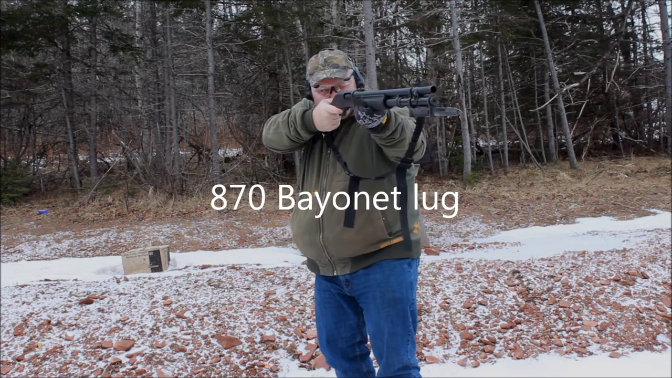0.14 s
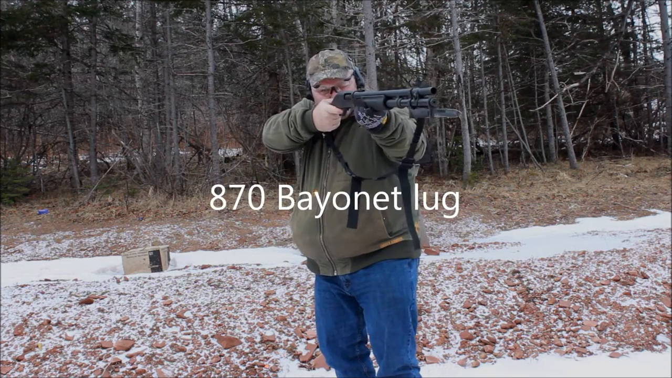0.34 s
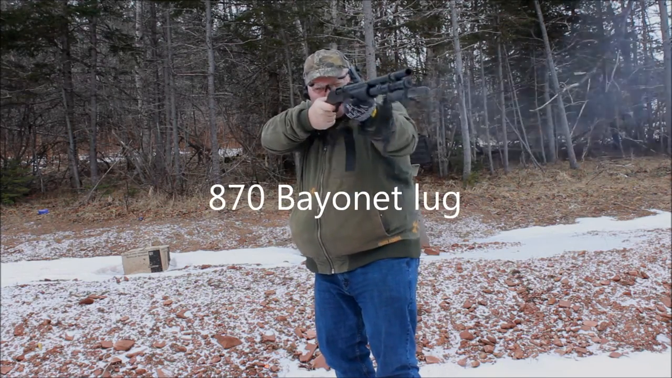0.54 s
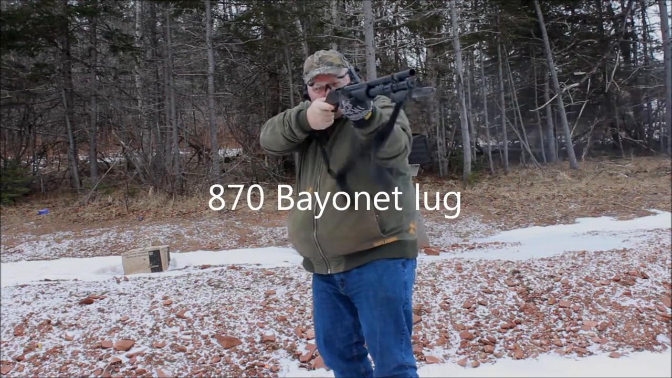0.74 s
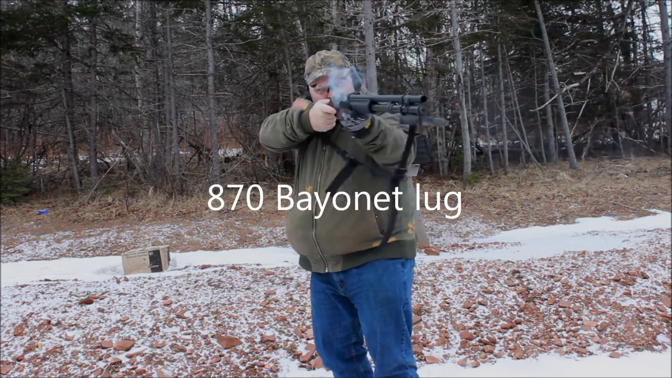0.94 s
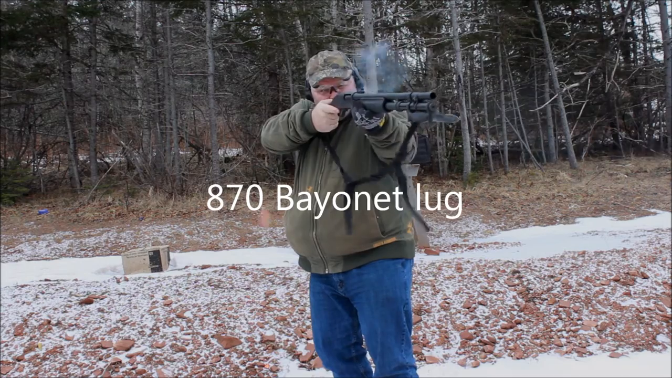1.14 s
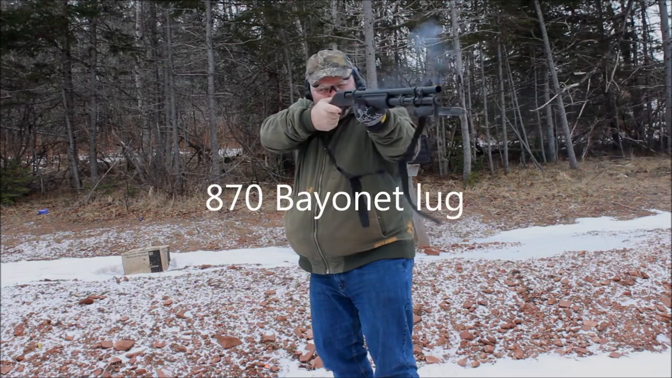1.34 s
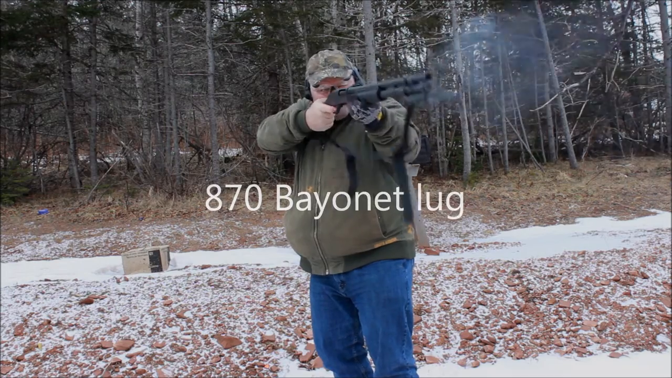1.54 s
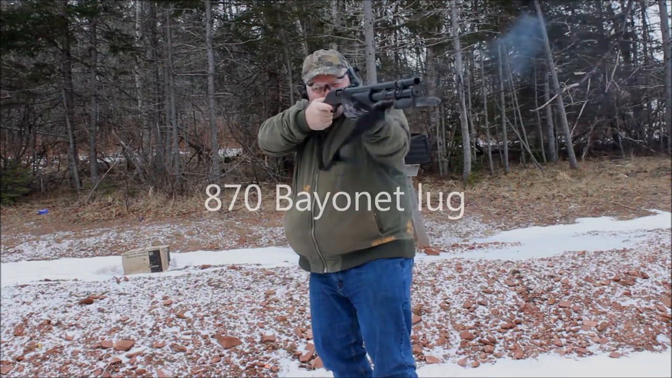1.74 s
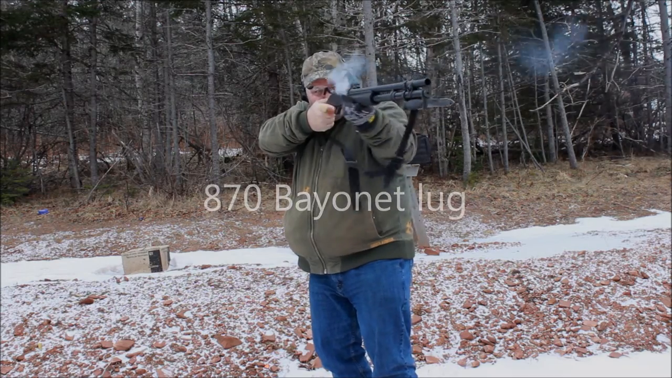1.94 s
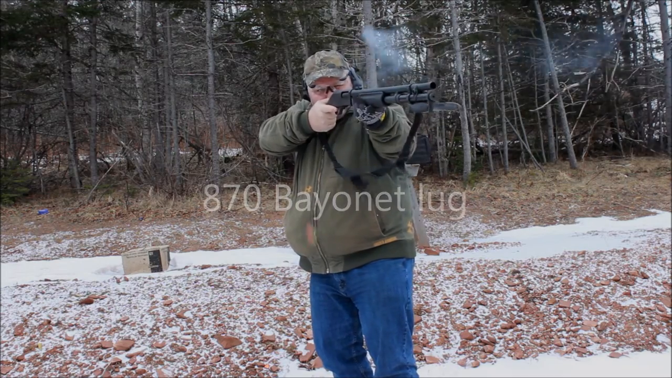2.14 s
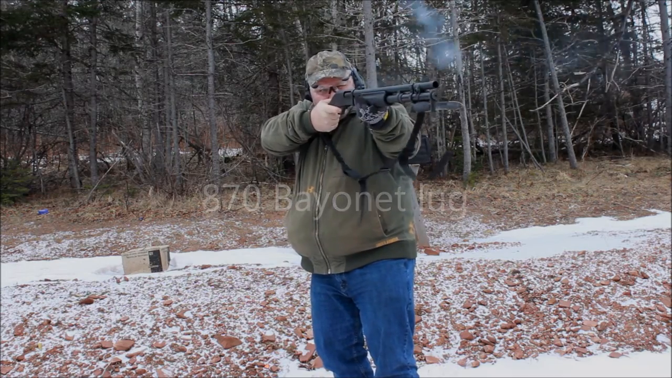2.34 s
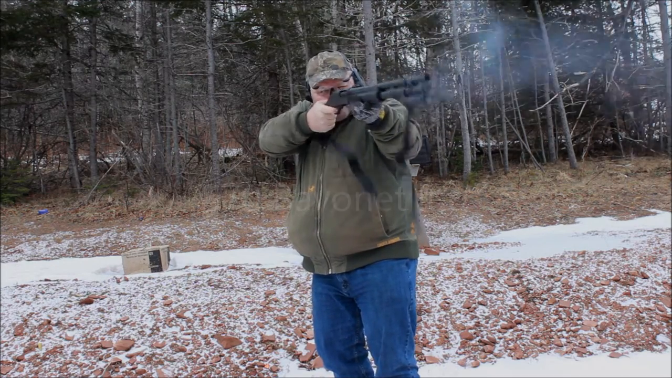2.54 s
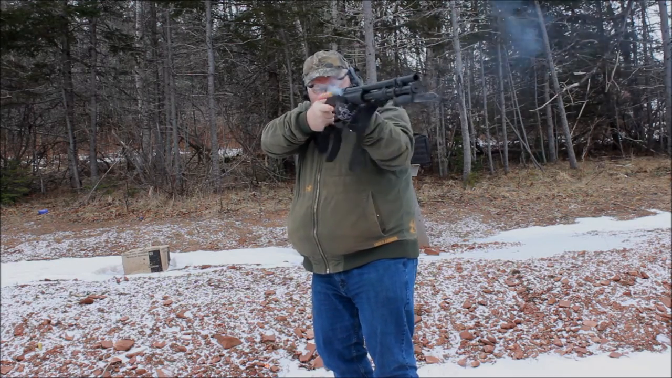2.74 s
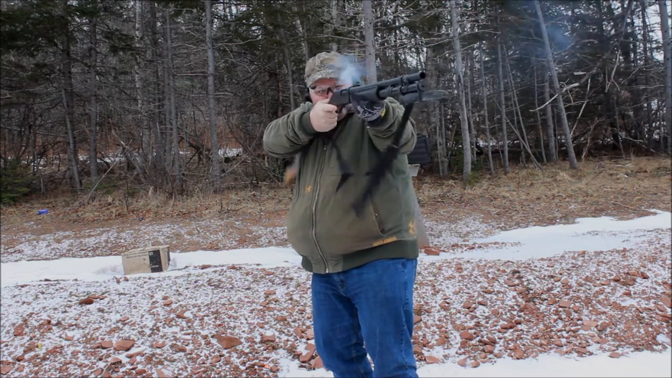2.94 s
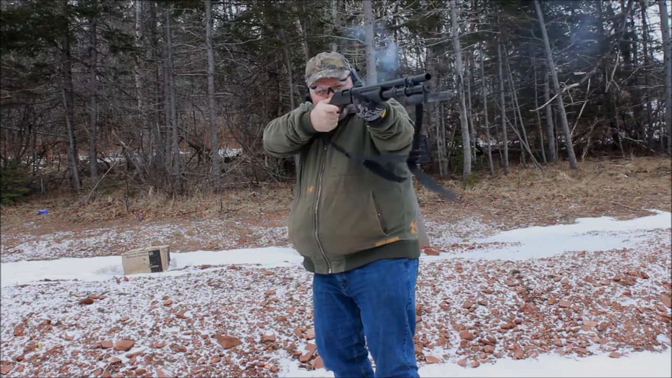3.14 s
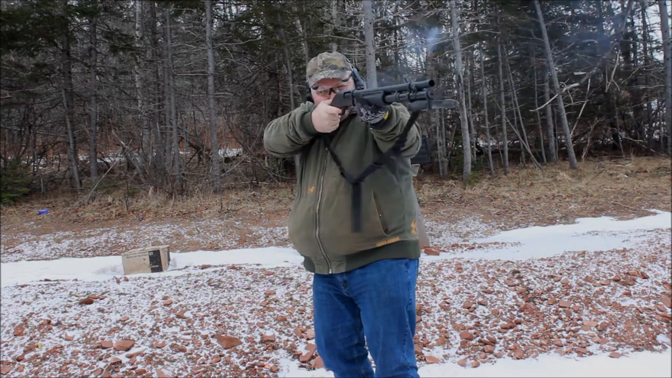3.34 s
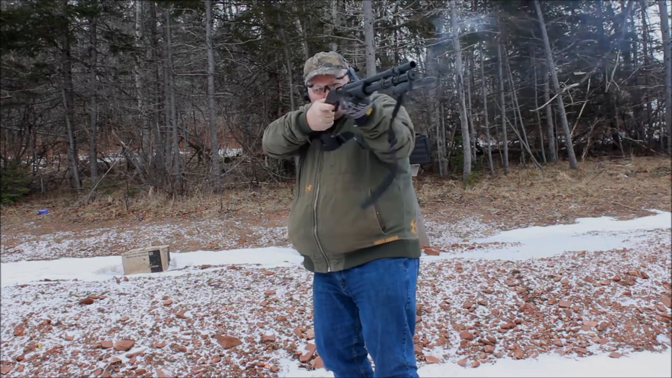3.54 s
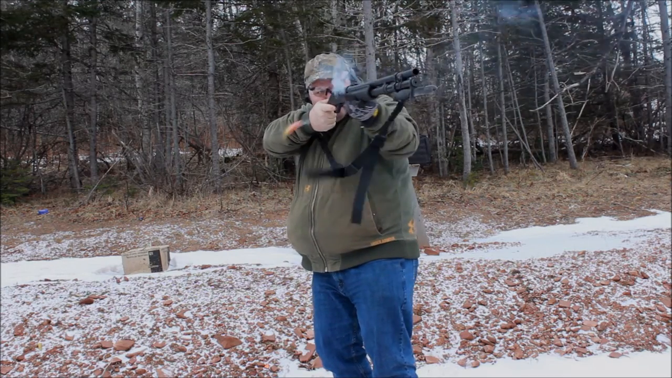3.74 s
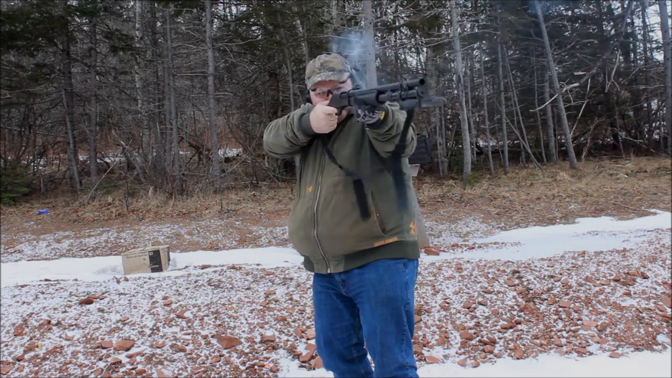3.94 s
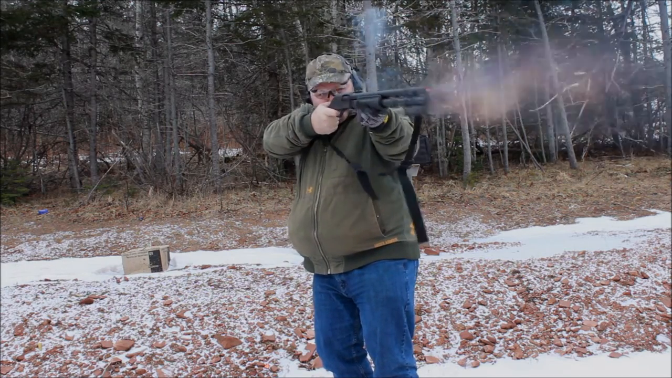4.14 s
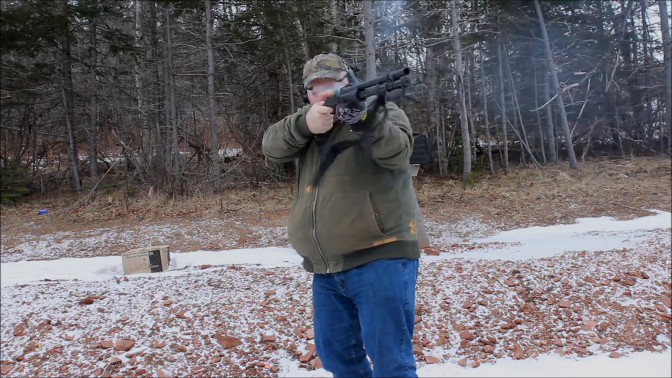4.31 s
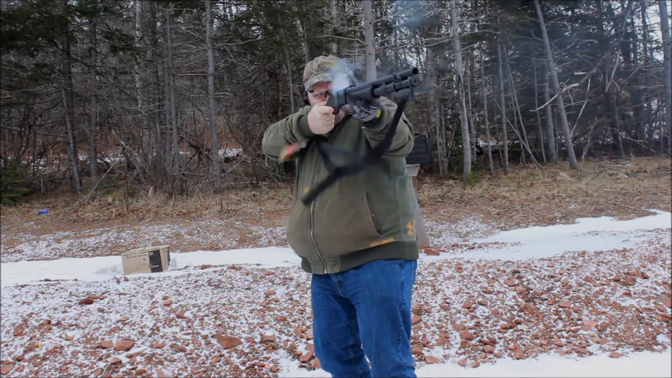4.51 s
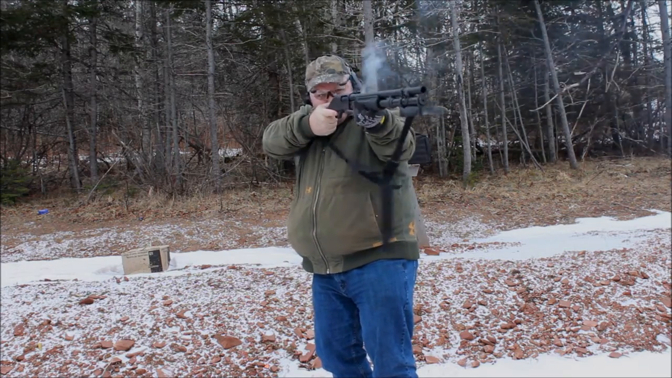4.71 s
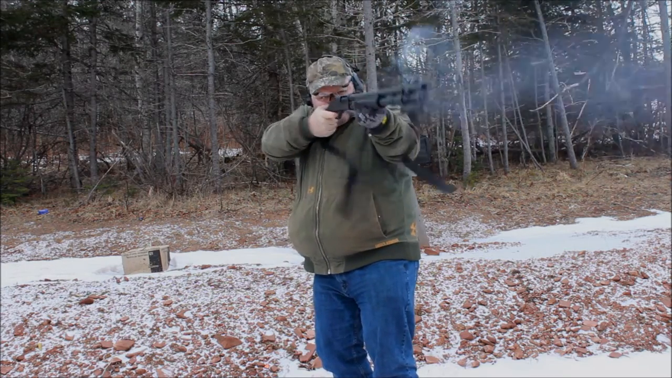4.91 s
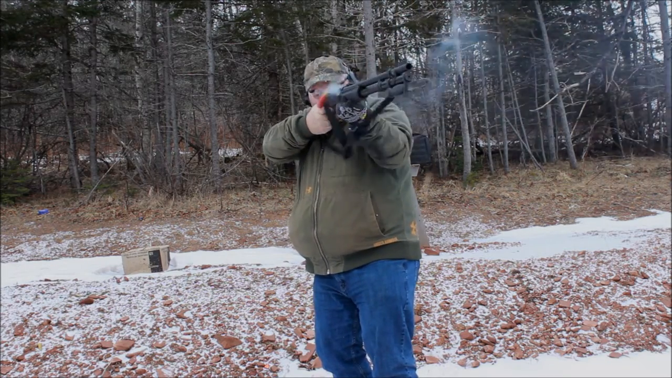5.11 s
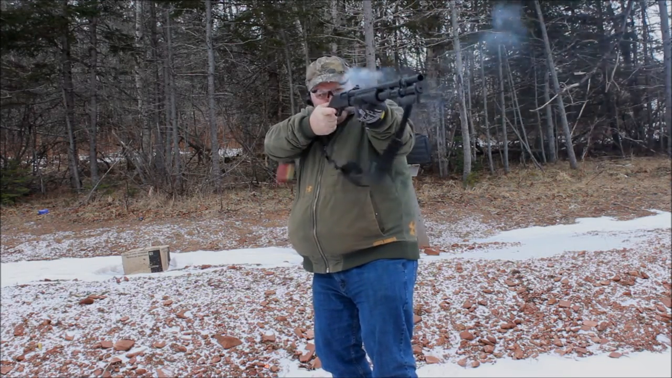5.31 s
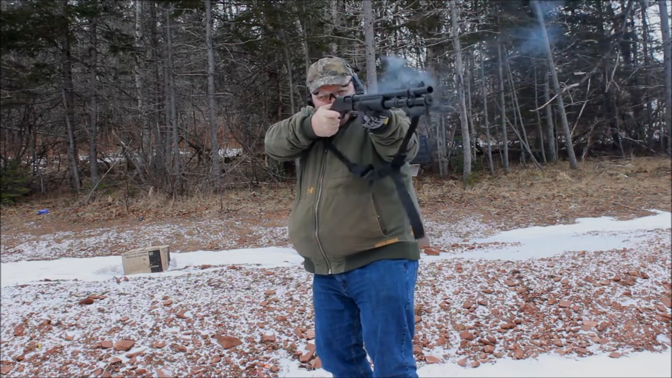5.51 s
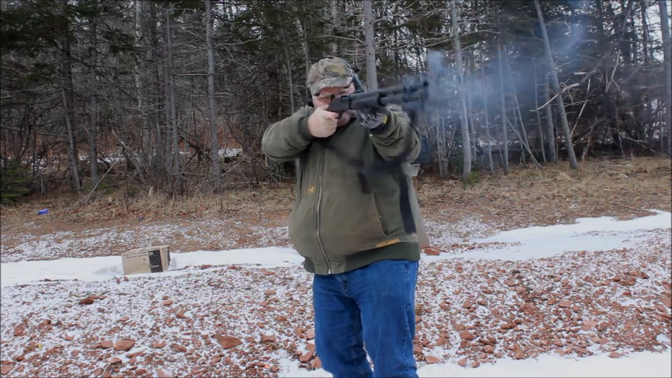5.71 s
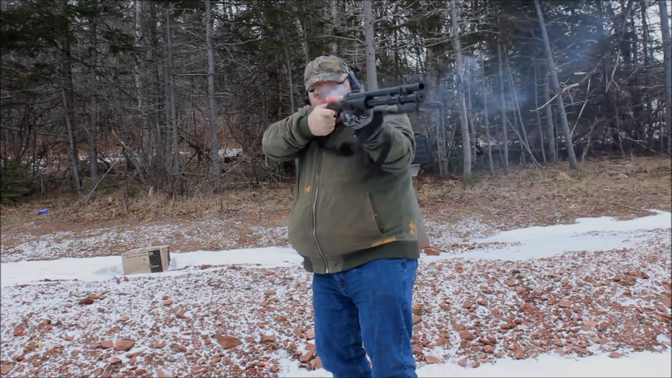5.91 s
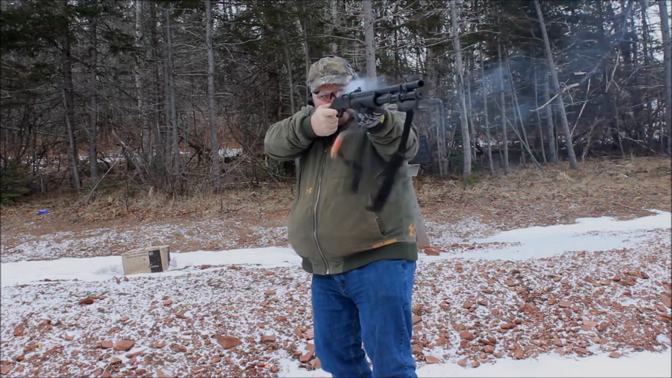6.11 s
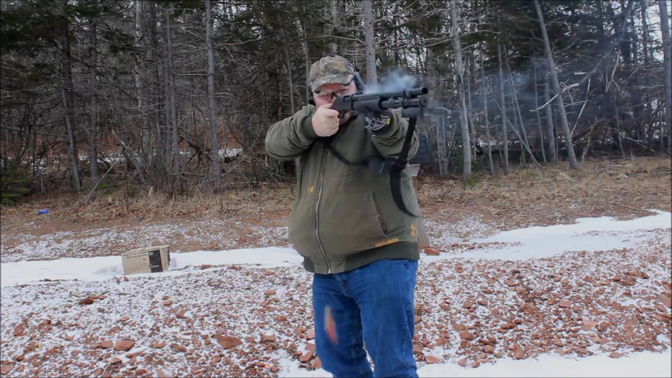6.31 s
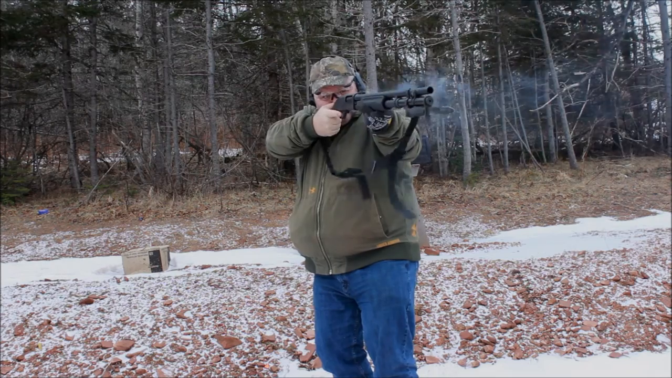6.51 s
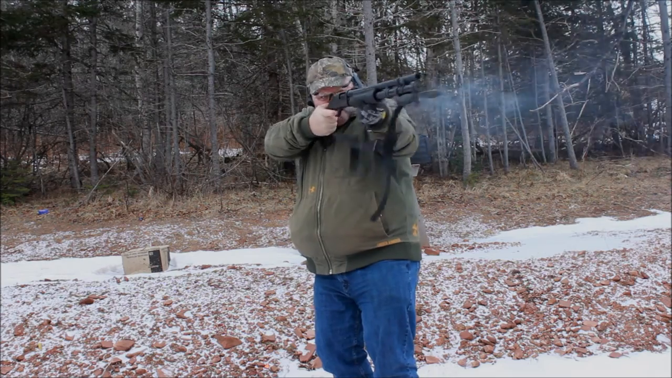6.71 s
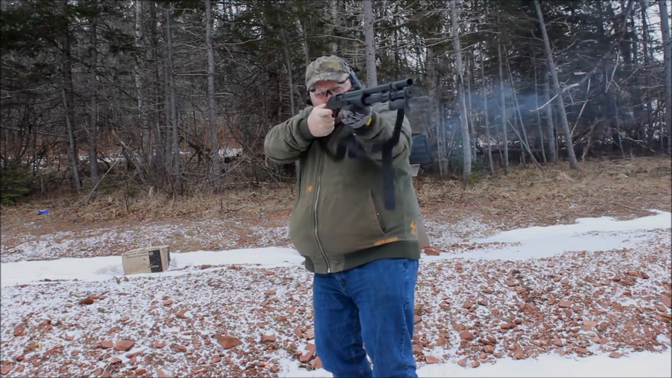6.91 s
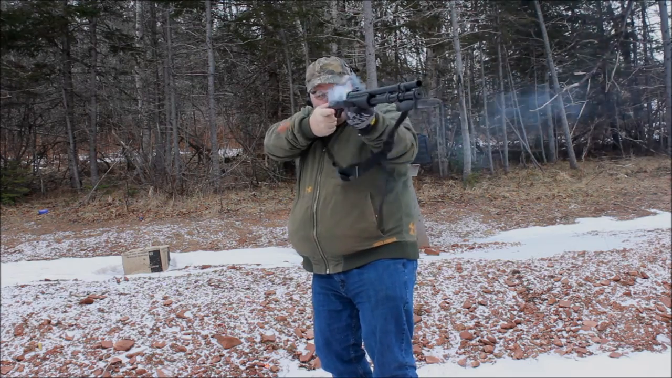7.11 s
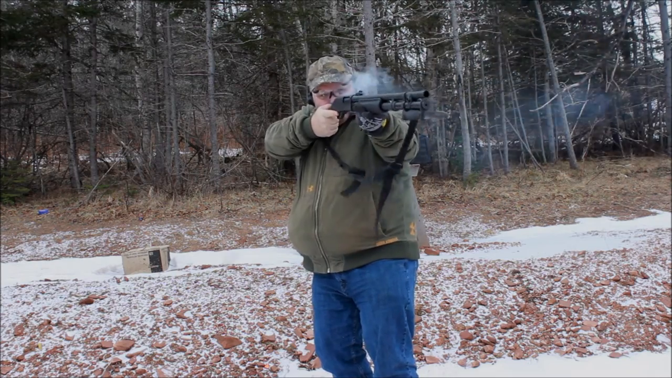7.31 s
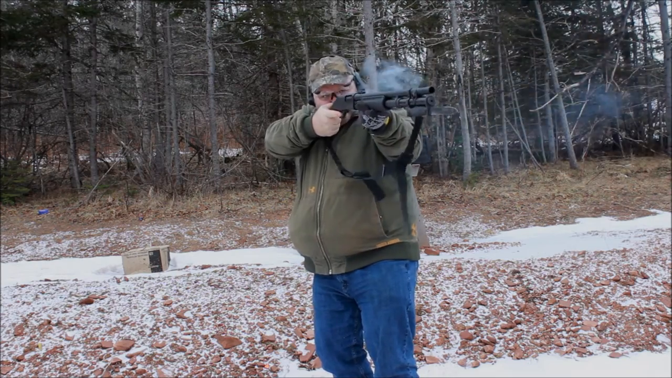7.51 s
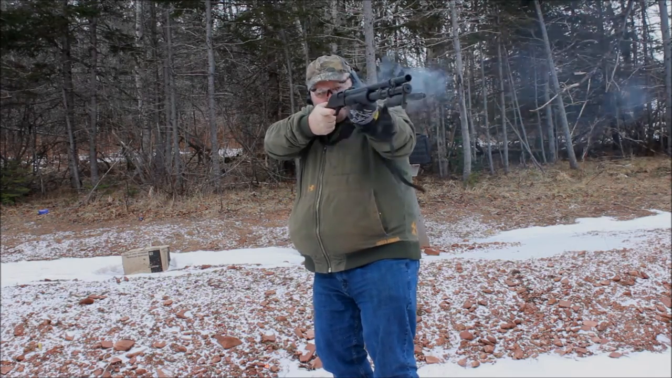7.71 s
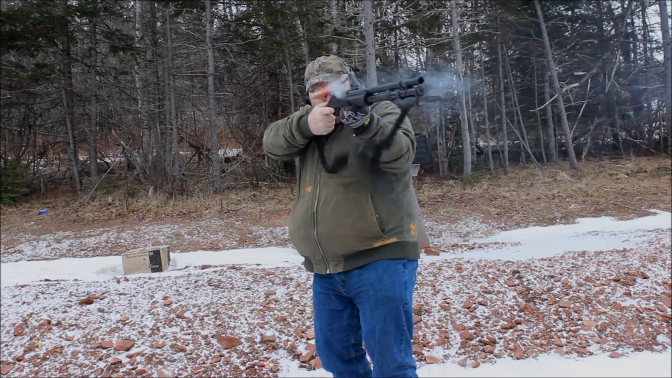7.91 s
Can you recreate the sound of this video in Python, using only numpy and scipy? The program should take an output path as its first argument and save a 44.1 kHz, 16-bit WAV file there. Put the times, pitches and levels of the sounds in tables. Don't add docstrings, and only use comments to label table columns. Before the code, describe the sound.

Nine pump shotgun blasts about a second apart at a wood's edge, overloading the microphone, with steel clacks between and forest echoes rolling after.

```python
import sys
import numpy as np
from scipy import signal
from scipy.io import wavfile

SR = 44100
rng = np.random.default_rng(int(sys.argv[2]) if len(sys.argv) > 2 else 0)


def makeup_ratio(level_db):
    decades = np.asarray(level_db, float) / 20
    return 10 ** decades


def pcm_store(signal):
    levels = np.round(np.clip(np.atleast_2d(signal), -1, 1) * 32767)
    wavfile.write(sys.argv[1], SR, levels.astype(np.int16).T)


N = 350595

# start_s, peak_db, overload_s, level_db once the gain has dropped, near_ring_db
SHOTS = [
    (0.466, 1, 0.009, -0.5, -4),
    (1.536, 6.5, 0.0081, -25.5, -7),
    (2.546, 4, 0.009, -3.5, -5),
    (3.405, 7, 0.0065, 0.5, -7.5),
    (4.184, -17.5, 0.01, -9, -9),
    (4.923, 8, 0.0058, 0.5, -4.5),
    (5.719, 3, 0.0073, -23, -10.5),
    (6.671, 6.5, 0.009, -2.5, -9.5),
    (7.619, 2, 0.0088, -1, -7),
]
# start_s, peak_db, hollow_ring_db, bounce_db
TICKS = [(1.4459, -2.5, 3, -21), (2.4312, -17.5, -21, -21.5), (2.4695, -43, -32, -18),
         (2.5045, -33.5, -25, -19), (3.3101, -16, -45, -17.5), (3.3214, -30, -39, -17.5),
         (4.912, -26.5, -8, -11), (5.679, -23, -17.5, -26), (6.5255, -17, -33.5, -20),
         (6.55, -35, -47.5, -14), (7.582, -9.5, -2.5, -21)]


def rms_one(x):
    return x / np.sqrt(np.mean(x ** 2) + 1e-20)


def at_hz(points, hz, column=1):
    points = np.array(points)
    return np.interp(np.log(hz), np.log(points[:, 0]), points[:, column])


def band(x, low_hz, high_hz):
    edges_hz = [low_hz, min(high_hz, .45 * SR)]
    return signal.sosfilt(signal.butter(2, edges_hz, "band", fs=SR, output="sos"), x)


def noise_bands(size):
    settle = 4000
    white = rng.standard_normal((2, size + settle))
    edges_hz = 35 * 2 ** (np.arange(28) / 3)
    bands = []
    for k, (low, high) in enumerate(zip(edges_hz, edges_hz[1:])):
        noise = band(white[k % 2], low, high)[settle:]
        bands.append((np.sqrt(low * high), rms_one(noise)))
    return bands


def coloured(spectrum, size):
    return rms_one(sum(makeup_ratio(at_hz(spectrum, hz)) * np.sqrt(hz) * noise for hz, noise in noise_bands(size)))


def ring(x, hz, t60):
    radius = makeup_ratio(-60 / (t60 * SR))
    turn = 2 * np.pi * hz / SR
    return signal.lfilter([0, np.sin(turn)], [1, -2 * radius * np.cos(turn), radius * radius], x)


def dying(t, t60, rise=0.0013):
    t = np.maximum(t, 0)
    return (1 - np.exp(-t / rise)) * makeup_ratio(-60 * t / t60)


def flicker(size, rate, depth_db):
    knots = rng.standard_normal(int(size / SR * 1000) + 2)
    place = np.arange(size) / SR * min(rate, 999)
    return makeup_ratio(depth_db * np.interp(place, np.arange(len(knots)), knots))


def add(out, s, sound):
    i = round(s * SR)
    out[i:i + len(sound)] += sound[:N - i]


def air():
    # pitch_hz, level_db per Hz
    air_spectrum = [(18, -37), (30, -2.5), (81, -2.5), (114, -5.5), (369, -9), (467, -4), (4780, -28.5),
                    (5890, -27), (15500, -33)]
    air_db, duck_db = -48.5, -11.5
    ducked = np.arange(N) / SR > SHOTS[0][0]
    return makeup_ratio(air_db + duck_db * ducked) * coloured(air_spectrum, size=N)


def gusts():
    # middle_s, half_length_s, level_db
    gust_table = [
        (.2, .35, -58),
        (1.25, .3, -61),
        (2.3, .3, -56.5),
        (3.3, .12, -66),
        (7.55, .2, -56),
    ]
    t = np.arange(N) / SR
    level = sum(makeup_ratio(db) * np.clip(1 - np.abs(t - s) / half, 0, 1) for s, half, db in gust_table)
    rumble = rms_one(band(rng.standard_normal(N), 22, 75))
    return level * flicker(N, rate=14, depth_db=3.0) * rumble


def blasts():
    # pitch_hz, level_db per Hz
    gas_spectrum = [(60, -10), (130, -6), (220, -3.5), (900, -3), (1300, -5), (3000, -6.5), (6000, -11),
                    (11000, -12.5), (15000, -17)]
    # pitch_hz, width_hz, level_db
    near_trunks = [(900, 89, -7.5), (1136, 300, -3.5), (2000, 1300, -10)]
    lead = .005
    out, t = np.zeros(N), np.arange(round(.075 * SR)) / SR - lead
    noise = coloured(gas_spectrum, size=len(SHOTS) * len(t)).reshape(len(SHOTS), -1)
    grains = rng.standard_normal(len(t))
    for gas, (s, db, overload, after_db, ring_db) in zip(noise, SHOTS):
        dropped = 1 / (1 + np.exp(np.clip((overload - t) / 0.00054, -50, 50)))
        dull = signal.lfilter([.35], [1, -.65], gas)
        gas = gas + (0.95 * dull - gas) * np.clip(t / 0.0056, 0, 1)
        leak = makeup_ratio(15300 * np.minimum(t - .0005, 0))
        loud = gas * (makeup_ratio(db + 15.5) * dying(t - .0005, 0.36) + leak) * (1 - dropped)
        after = makeup_ratio(after_db) * gas * dying(t - overload, 0.072) * dropped
        shared = grains + 0.23 * rng.standard_normal(len(t))
        trunks = sum(makeup_ratio(trunk_db) * rms_one(ring(shared, hz, 2.2 / width))
                     for hz, width, trunk_db in near_trunks)
        gate = dropped * np.clip((t - .015) / 0.0072, .25, 1) * np.clip((.036 - t) / 0.011, 0, 1)
        after = after + makeup_ratio(ring_db) * trunks * gate * makeup_ratio(-120 * t)
        after = np.where(after > 0, 0.17 * np.tanh(after / 0.48), 1.47 * after)
        add(out, s - lead, loud + band(after, 270, 13000))
    return out


def wood_answer():
    # delay_s, level_db, pitch_hz, length_s
    thuds = [(.001, -13.5, 217.6, 0.019), (.013, -26.5, 215, 0.022), (.028, -29.5, 210.6, .014),
             (0.045, -29, 260, 0.011), (.054, -26, 198, 0.011), (.068, -45, 250, 0.0056),
             (.080, -38, 198, 0.019), (.112, -35, 190, 0.04), (0.131, -33.5, 261, 0.032),
             (0.164, -28, 243.3, 0.033), (0.205, -33.5, 216, 0.022), (.222, -30.5, 204, 0.019),
             (.240, -38.5, 150, 0.037), (0.16, -41.5, 305.6, 0.065), (.190, -40, 330, 0.017),
             (.100, -42, 132, 0.027), (.045, -41, 100.4, 0.055), (.165, -43, 103, 0.033),
             (.218, -48, 105, 0.063)]
    # delay_s, level_db, centre_hz, t60_s
    slaps = [
        (.033, -21.5, 1500, 0.086),
        (.042, -19.5, 900, 0.054),
        (0.057, -22.5, 900, 0.097),
        (.080, -40, 990, 0.046),
        (0.172, -33, 770, 0.33),
        (0.211, -33, 2000, 0.23),
        (0.311, -30.5, 1080, 0.13),
    ]
    # pitch_hz, level_db, t60_s
    trunk_scatter = [(150, -45, 0.55), (296, -38, 0.67), (597, -36.5, 0.52), (1180, -31.5, 0.56),
                     (2500, -35, 0.65), (5100, -36.5, 0.45), (10200, -46.5, .5), (15000, -51.5, .45)]
    t = np.arange(round(.8 * SR)) / SR
    answer = np.zeros(len(t))
    for delay, db, hz, length in thuds:
        phase = np.clip((t - delay) / length, 0, 1)
        turn = 2 * np.pi * hz * (t - delay)
        partials = np.sin(turn) + 0.23 * np.sin(1.6 * turn) + 0.15 * np.sin(0.54 * turn)
        answer += makeup_ratio(db) * np.sin(np.pi * phase) ** 2 * partials
    for delay, db, hz, t60 in slaps:
        noise = rms_one(band(rng.standard_normal(len(t)), hz * 0.67, hz * 1.28))
        answer += makeup_ratio(db) * noise * dying(t - delay, t60, rise=.002)
    out, clusters = np.zeros(N), flicker(len(t), rate=100, depth_db=3.0)
    for s, *_ in SHOTS:
        scatter = np.zeros(len(t))
        for hz, noise in noise_bands(size=len(t)):
            if hz > 130:
                t60 = at_hz(trunk_scatter, hz, column=2)
                scatter += makeup_ratio(at_hz(trunk_scatter, hz)) * noise * dying(t - .030, t60, rise=0.0045)
        add(out, s, answer + clusters * scatter)
    return out


def far_wash():
    # level_db, gain_return_speed (0-2)
    wash_after = [(-2, 1.07), (3.5, 0.94), (0.2, 1.12), (-2, 0.98), (-0.1, 0.95), (-2, 1.06), (0, 1.05),
                  (-0.5, 0.99), (0.8, 1.3)]
    # pitch_hz, level_db, loss_db_per_s
    wash_loss = [(111, -56, 15.5), (400, -48.5, 5), (900, -42, -1), (2000, -40, 14), (4000, -43, 32)]
    # pitch_hz, level_db
    wash_colour = [(45, -32.5), (90, 3.5), (250, -0.5), (450, -2), (640, -1), (880, 6), (1100, 1.5),
                   (1450, -1.5), (1900, 3.5), (2500, -3.5), (3200, 2.5), (4000, 0), (6000, -6),
                   (9000, -16.5)]
    gain_return_db_per_s, wash_rise_s = 15.0, 0.12
    tick_duck_db, tick_duck_s = -4.5, 0.3
    t, out, fired = np.arange(N) / SR, np.zeros(N), np.array([row[0] for row in SHOTS])
    last = np.maximum(np.searchsorted(fired, t) - 1, 0)
    since = np.maximum(t - fired[last], 0)
    shot_db, speed = np.transpose(wash_after)
    gain_db = shot_db[last] + gain_return_db_per_s * speed[last] * (since - .25)
    for s, db, *_ in TICKS:
        gain_db += tick_duck_db * makeup_ratio(db) * (t > s) * np.exp(-np.abs(t - s) / tick_duck_s)
    for hz, noise in noise_bands(size=N):
        lost_db = at_hz(wash_loss, hz, column=2) * (since - .25)
        level_db = at_hz(wash_loss, hz) - lost_db + at_hz(wash_colour, hz) - 7
        out += noise * flicker(N, rate=12, depth_db=2.0) * makeup_ratio(level_db)
    out = signal.sosfilt(signal.butter(2, 4500, fs=SR, output="sos"), out)
    rise = np.clip(since / wash_rise_s, 0, 1)
    return out * flicker(N, rate=35, depth_db=1.5) * makeup_ratio(gain_db) * rise


def strokes():
    # start_s, peak_db, strongest_hz
    opening = [(0.7781, -32.5, 6530), (0.8261, -31.5, 3600), (0.908, -22.5, 5100), (1.7837, -22.5, 3340),
               (1.9009, -22.5, 4560), (1.9146, -30.5, 3280), (2.7903, -30.5, 3750), (3.6513, -31.5, 3310),
               (3.676, -40.5, 3200), (4.3696, -30, 3690), (5.1344, -33.5, 3370), (5.949, -28, 3100),
               (6.943, -35.5, 3410), (7.0255, -41, 3080)]
    # start_s, peak_db, strongest_hz
    rear_stops = [(0.854, -10.5, 4650), (1.8431, -11, 3330), (2.7412, -17, 4590), (3.6057, -17.5, 4540),
                  (4.3215, -21.5, 4126), (5.0893, -19.5, 5500), (5.9112, -17, 4720), (6.9826, -13.5, 4250),
                  (7.874, -15, 5360)]
    # start_s, peak_db
    feeding = [(0.9602, -30), (0.9725, -27.5), (0.994, -24.5), (1.0067, -32.5), (1.0322, -33),
               (1.0445, -28.5), (1.0504, -26), (1.9362, -27.5), (1.9507, -31), (1.9644, -26),
               (2.0098, -23.5), (2.8759, -27.5), (2.923, -32.5), (3.72, -36), (3.746, -31.5), (3.7903, -35),
               (4.449, -38), (4.477, -36.5), (4.4993, -37.5), (4.532, -35), (5.208, -36), (5.2385, -30),
               (5.2898, -35), (6.0564, -31), (6.099, -39.5), (6.1434, -35.5), (6.2214, -36.5),
               (7.1088, -30), (7.1352, -34), (7.183, -35), (7.1964, -29)]
    # start_s, peak_db, strongest_hz, lug_delay_s, lug_db
    closes = [(1.069, -7.5, 3330, .0065, -7.5), (2.0302, -6.5, 3190, 0.0048, -5.5),
              (2.942, -11.5, 6660, 0.0082, -12.5), (3.8121, -15.5, 3270, .0055, -16.5),
              (4.5476, -15, 3250, .0094, -12), (5.3095, -14.5, 6720, .0068, -16),
              (6.2424, -15, 3330, 0.0059, -21), (7.219, -6, 6580, .0069, -10.5)]
    # start_s, peak_db
    settling = [
        (1.2471, -37),
        (2.2092, -46),
        (4.6345, -37),
        (5.515, -51),
        (6.411, -48),
        (7.4205, -36),
    ]
    touch = (0.07, -3.5, -4.5)   # t60_s, low_body_db, treble_db
    contacts = [(s, db, hz, *touch) for s, db, hz in opening]
    contacts += [(s, db, 3300, *touch) for s, db in feeding + settling]
    contacts += [(s, db, hz, 0.0244, -6, -3) for s, db, hz in rear_stops]
    for s, db, hz, lug_delay, lug_db in closes:
        contacts.append((s, db, hz, 0.0458, -9.5, -4))
        contacts.append((s + lug_delay, lug_db, 3600, 0.0235, -4, -4.5))
    return contacts


def action():
    # pitch_hz, level_db, t60_s
    steel_modes = [(3250, 0, .006), (4500, -2, .006), (6400, 0, .012), (7700, -2, .006)]
    out, t = np.zeros(N), np.arange(round(.15 * SR)) / SR
    for s, db, hz, t60, body_db, treble_db in strokes():
        rattle = rng.standard_normal(len(t)) * flicker(len(t), rate=1400, depth_db=4)
        hit = makeup_ratio(1.0) * dying(t - .0015, 0.0065, rise=.0002)
        tail = dying(t, t60, rise=0.001) + makeup_ratio(-32.0) * dying(t, 0.29, rise=.005)
        contacts = rattle * (hit + tail)
        crack = rms_one(band(contacts, 2400, 7220))
        crack = crack + makeup_ratio(treble_db) * rms_one(band(contacts, 9300, 14500))
        modes = sum(makeup_ratio(mode_db + 3 * rng.standard_normal()) * rms_one(ring(contacts, mode_hz, mode_t60))
                    for mode_hz, mode_db, mode_t60 in steel_modes)
        bright = crack + makeup_ratio(-19) * modes + makeup_ratio(-13) * rms_one(ring(contacts, hz, .008))
        sound = bright + makeup_ratio(body_db) * rms_one(band(contacts, 515, 3300))
        add(out, s, makeup_ratio(db) * sound / np.abs(bright).max())
    return out


def slide():
    # start_s, length_s, level_db
    rubs = [(.80, .38, -59), (1.748, 0.49, -53.5), (2.72, .3, -56), (3.582, .32, -61), (4.3, 0.333, -58),
            (5.07, .33, -62), (5.901, 0.47, -61), (6.922, 0.57, -58), (7.804, .3, -61)]
    hold_s, fade_db_per_s = 0.14, 52.5
    t, level = np.arange(N) / SR, np.zeros(N)
    for s, length, db in rubs:
        fade_db = fade_db_per_s * np.clip(t - s - hold_s, 0, 1)
        level += makeup_ratio(db - fade_db) * np.clip(np.minimum(t - s, s + length - t) / 0.031, 0, 1)
    grit = rng.standard_normal(N) * flicker(N, rate=140, depth_db=7.0)
    return makeup_ratio(1.0) * level * rms_one(band(grit, 4000, 10000))


def ticks():
    # pitch_hz, level_db, t60_s
    hull_modes = [(1290, 0, .022), (1900, -7, .006), (2700, -6, .004), (3900, -10, .008)]
    out, t = np.zeros(N), np.arange(round(.08 * SR)) / SR
    click = (np.arange(len(t)) == 4) * 1.
    hull = sum(makeup_ratio(mode_db) * ring(click, mode_hz, mode_t60) for mode_hz, mode_db, mode_t60 in hull_modes)
    hollow = band(hull, 1200, 8000)
    for s, db, hollow_db, bounce_db in TICKS:
        bounce = makeup_ratio(bounce_db) * dying(t - .003, 0.015, rise=.0003)
        contact = rng.standard_normal(len(t)) * (dying(t, 0.0031, rise=.0001) + bounce)
        snap = band(contact, 2900, 12000)
        add(out, s + 0.0013, makeup_ratio(db) * snap / np.abs(snap).max() + makeup_ratio(hollow_db - 2.0) * hollow)
    return out


def scene():
    place = air() + gusts()
    shots = blasts() + wood_answer() + far_wash()
    handling = action() + slide() + ticks()
    return (place + shots + handling)[None, :]


def low_pass(x):
    return signal.sosfilt(signal.butter(12, 15900, fs=SR, output="sos"), x)


def record(dry):
    clipped = np.clip(dry, -1, 1)
    thin = signal.sosfilt(signal.butter(1, 35, "high", fs=SR, output="sos"), clipped)
    mix = signal.sosfilt(signal.butter(2, 17500, fs=SR, output="sos"), thin)
    return low_pass(mix)


dry = scene()
out = record(dry)
pcm_store(out)
```